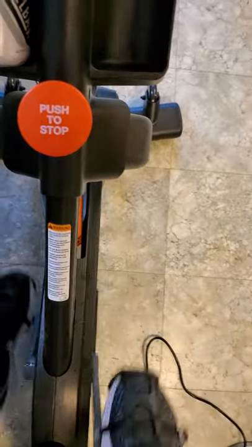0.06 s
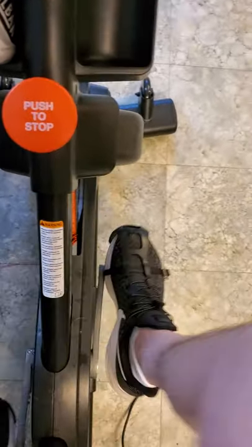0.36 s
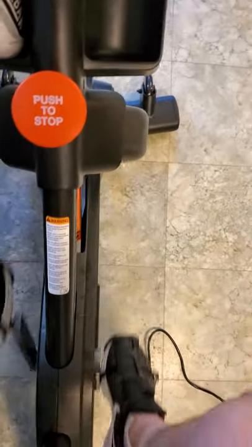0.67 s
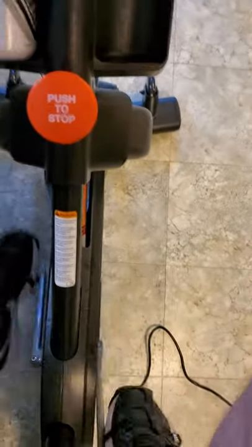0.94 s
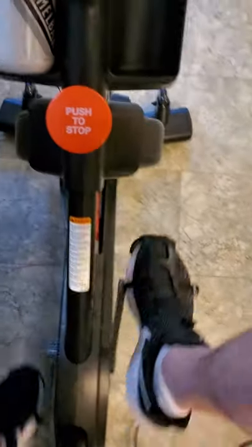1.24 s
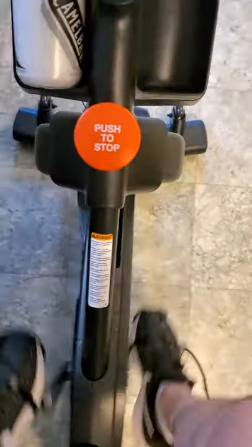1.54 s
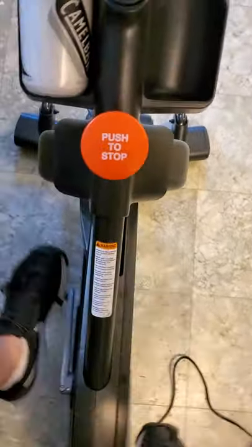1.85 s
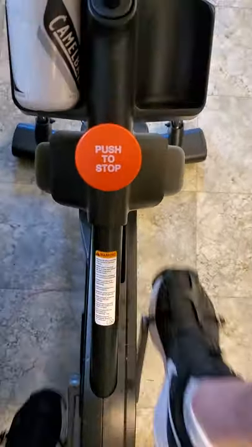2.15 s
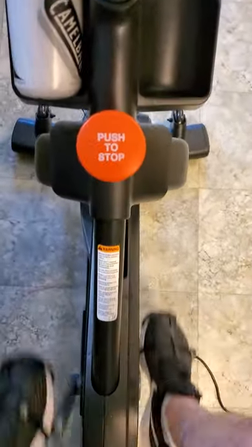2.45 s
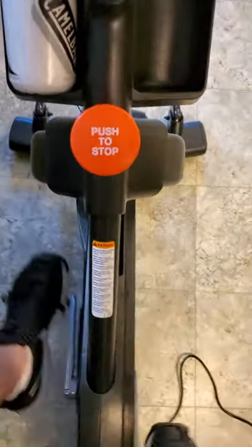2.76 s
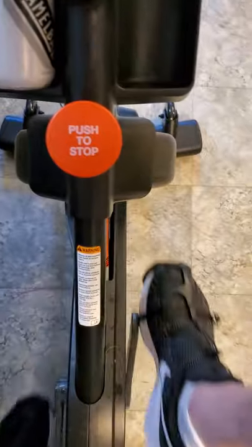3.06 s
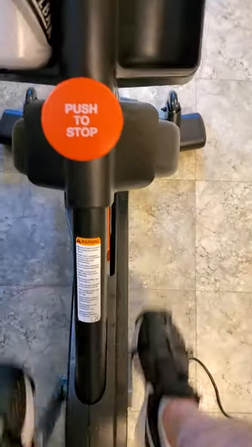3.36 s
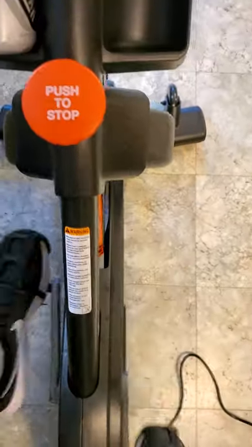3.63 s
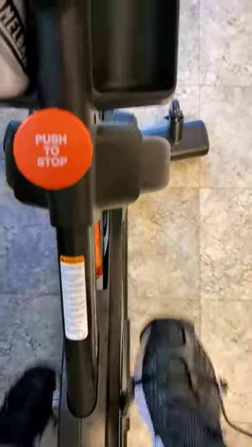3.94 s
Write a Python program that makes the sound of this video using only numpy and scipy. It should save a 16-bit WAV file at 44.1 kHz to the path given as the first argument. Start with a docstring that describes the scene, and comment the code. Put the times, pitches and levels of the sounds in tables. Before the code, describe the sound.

Loose parts knock in a pedaled exercise bike while its wheel whirrs and hisses.

```python
"""In a small tiled room, on the saddle of an exercise bike. The flywheel whirrs steadily, the drive
hums, and each pedal stroke swells a hiss of rubbing on the wheel. Loose parts in the drive knock
several times a turn: each knock is a short chatter of contacts that rings the frame and the room.
A few sharp ticks come from the bike, something brushes lightly on the right, and the hand that
holds the microphone makes soft bumps."""
import sys
import numpy as np
from scipy import signal
from scipy.fft import rfft, irfft
from scipy.io import wavfile
from scipy.ndimage import uniform_filter1d

SR = 44100
rng = np.random.default_rng(int(sys.argv[2]) if len(sys.argv) > 2 else 0)


def wrap_up_sound(samples):
    """Save the sound to the file named by the first command line argument, as 16-bit audio."""
    columns = np.atleast_2d(samples).T
    # keep every value between -1 and 1, then stretch to whole-number steps
    tamed = np.clip(columns, -1, 1)
    steps = np.round(tamed * 32767).astype(np.int16)
    wavfile.write(sys.argv[1], SR, steps)


N = 176400  # 4 seconds


def undb(db):
    """Turn decibels into a gain to multiply by."""
    return 10 ** (np.asarray(db) / 20)


def unit(x):
    """Scale a sound to an average power of 1."""
    return x / np.sqrt(np.mean(x ** 2))


def sized(x, seconds):
    """Give a hit the energy of a power-1 sound of this length."""
    return x * np.sqrt(seconds * SR / np.sum(x ** 2))


def add(out, start_s, x):
    """Mix x into out at the given time."""
    i = max(int(start_s * SR), 0)
    out[..., i:i + x.shape[-1]] += x[..., :max(N - i, 0)]


def lowpass(x, hz, order=2):
    """Dull a sound by turning down what lies above hz."""
    return signal.sosfilt(signal.butter(order, min(hz, .45 * SR), fs=SR, output="sos"), x)


def colour(x, points):
    """Shape bass and treble along a curve of (pitch_hz, gain_db) points."""
    hz, db = np.array(points).T
    bins_hz = np.maximum(np.fft.rfftfreq(N, 1 / SR), 1)
    gain = undb(np.interp(np.log(bins_hz), np.log(hz), db))
    return irfft(rfft(x) * gain, N)


def wander(per_s):
    """A smooth random drift, about 1 in size."""
    hold = int(SR / per_s)
    steps = np.repeat(rng.standard_normal(N // hold + 1), hold)
    return unit(uniform_filter1d(uniform_filter1d(steps, hold), hold)[:N])


def pan(db):
    """Left and right gains; positive db favours the left."""
    return undb(np.array([[db], [-db]]) / 2)


def ring(tones, t):
    """A struck part's tones, tuned a little differently at each blow; each drops 60 dB in fade_s."""
    detune = 1 + 0.0073 * rng.standard_normal(len(tones))
    return sum((-1) ** k * undb(db - 60 * t / fade_s) * np.sin(2 * np.pi * hz * detune[k] * t)
               for k, (hz, fade_s, db) in enumerate(tones))


def room(x):
    """Tiled walls return a wash of echoes on each side, the treble dying first."""
    bass_fade_s, treble_fade_s, delay_s = 0.52, 0.24, 0.0023
    t = np.arange(SR // 2) / SR
    noise = rng.standard_normal((2, len(t)))
    bass = lowpass(noise, 1000)
    tails = bass * undb(-60 * t / bass_fade_s) + (noise - bass) * undb(-60 * t / treble_fade_s)
    tails *= np.clip(t / delay_s - .5, 0, 1)
    return np.array([signal.fftconvolve(x, tail / np.sqrt(np.sum(tail ** 2)))[:N] for tail in tails])


def flywheel_whirr():
    """The spinning wheel keeps the frame's low resonances sounding."""
    # tone of the wheel and room: pitch_hz, gain_db
    whirr_curve = [(20, -6), (35, 4), (65, 1), (100, -9), (170, -5), (225, -1), (270, -5), (310, -3.5),
                   (370, -5), (440, 3), (520, -8.5), (650, -11), (800, -17.5), (1400, -23.5), (2100, -22),
                   (3200, -33.5), (8000, -36.5), (16000, -37)]
    # stereo width, as side compared with middle: pitch_hz, gain_db
    width_curve = [(30, -13.5), (250, -13), (500, -9.5), (1000, 4), (4000, -2.5)]
    middle, side = (unit(colour(rng.standard_normal(N), whirr_curve)) for _ in range(2))
    level_db = -50.5 + 1.25 * wander(per_s=12)
    return undb(level_db) * (middle + colour(side, width_curve) * np.array([[1], [-1]]))


def drive_hum():
    """The running drive gives one faint, wavering tone."""
    level_db = -60.5 + 2 * wander(per_s=7.9)
    pitch_hz = 264.6 * (1 + 0.0124 * wander(per_s=15))
    return undb(level_db) * unit(np.sin(2 * np.pi * np.cumsum(pitch_hz) / SR))


def light_brushes():
    """Something slides lightly, close on the right, in short hisses."""
    # slides: start_s, length_s, level_db
    slides = [(0.645, 0.19, -56.5), (0.866, 0.11, -53), (1.026, 0.12, -50), (1.807, 0.11, -48.5)]
    # tone of the sliding: pitch_hz, gain_db
    slide_curve = [(500, -16), (7000, -11.5), (9500, -16.5), (12500, -3.5), (14500, -0.5), (16000, -15)]
    left_db = -14
    swell = np.zeros(N)
    for start_s, length_s, level_db in slides:
        add(swell, start_s, undb(level_db) * signal.windows.tukey(int(length_s * SR), .6))
    hiss = unit(colour(rng.standard_normal((2, N)), slide_curve))
    flicker = undb(2 * wander(per_s=90))
    return swell * flicker * hiss * undb([[left_db], [0]])


def hand_bumps():
    """The hand shifts on the microphone's case, making short dull rumbles."""
    # hand movements: start_s, length_s, level_db, cutoff_hz
    bumps = [(1.467, .075, -41, 256), (1.536, 0.058, -44, 122), (1.789, 0.12, -50, 107),
             (1.886, .012, -39, 520), (2.763, 0.067, -48.5, 118), (2.82, 0.092, -43, 64)]
    out = np.zeros(N)
    for start_s, length_s, level_db, cutoff_hz in bumps:
        count = int(length_s * SR)
        rumble = lowpass(rng.standard_normal(SR // 2), cutoff_hz, order=3)[-count:]
        add(out, start_s, undb(level_db) * unit(rumble * signal.windows.tukey(count, .5)))
    return out


def sharp_ticks():
    """A small hard part snaps: a brief ring and a bright splash of noise."""
    # snaps: start_s, level_db, left_over_right_db, splash_over_ring_db
    ticks = [(0.0788, -19.5, -10, 4), (.935, -45, -8, 6), (1.086, -43, -1, 6), (1.478, -51.5, 18.5, 6),
             (1.891, -34, -13, 15.5), (1.935, -40.5, -9.5, -4), (3.418, -51, -20, 3)]
    # ringing tones of the part: pitch_hz, fade_s, level_db
    part_tones = [(2120, 0.0028, 1.5), (3870, .004, 6), (5820, 0.0025, 7), (7000, 0.0019, 8)]
    splash_hz, splash_s, room_db = 13780, 0.00061, -11.5
    out, t = np.zeros((2, N)), np.arange(SR // 40) / SR
    for start_s, level_db, pan_db, splash_db in ticks:
        # multiplying by a tone moves the dull noise up around splash_hz
        noise = lowpass(rng.standard_normal((2, len(t))), 1920) * np.cos(2 * np.pi * splash_hz * t)
        splash = noise * t * np.exp(-t / splash_s)
        snap = unit(ring(part_tones, t)) + undb(splash_db) * unit(splash)
        add(out, start_s, undb(level_db) * pan(pan_db) * sized(snap, seconds=0.0024))
    return out + undb(room_db) * room(out.mean(axis=0))


def flywheel_rubbing():
    """Friction on the flywheel makes a hiss that rises and falls with each pedal stroke."""
    # pedal strokes, each lasting until the next: start_s, push_db
    strokes = [(-.2, 5.5), (.21, 4.5), (0.732, 5), (1.171, 4.5), (1.65, 3.5), (2.1, 3), (2.55, 3.5),
               (3.04, 3), (3.52, 2.5), (4.02, 2)]
    # tone of the rubbing on the left: pitch_hz, gain_db
    left_curve = [(1000, -38), (2100, 0.5), (2900, -4.5), (5000, -10.5), (7200, -3.5), (8500, -9),
                  (10500, -13), (13000, -1.5), (15500, -19)]
    # and on the right: pitch_hz, gain_db
    right_curve = [(1000, 0), (2100, 4.5), (2800, -4.5), (3900, 0.5), (5000, -2.5), (7000, 1.5), (8800, -9),
                   (10800, -2), (12500, 5), (14000, 5), (16000, -1)]
    left_db, right_db, resting_gain = -64, -52.5, 0.43
    start_s, push_db = np.array(strokes).T
    strokes_done = np.interp(np.arange(N) / SR, start_s, np.arange(len(start_s)))
    push = np.abs(np.sin(np.pi * strokes_done)) * undb(push_db)[strokes_done.astype(int)]
    effort = (resting_gain + (1 - resting_gain) * push) * undb(wander(per_s=30.01))
    left = undb(left_db) * unit(colour(rng.standard_normal(N), left_curve))
    right = undb(right_db) * unit(colour(rng.standard_normal(N), right_curve))
    return effort * np.array([left, right])


def chatter_force(t, rise_s):
    """The force of a run of contacts builds to a peak and dies away."""
    first_touch, decay_s = 0.55, 0.0059
    rising = first_touch + (1 - first_touch) * t / rise_s
    falling = np.exp(-np.maximum(t - rise_s, 0) / decay_s)
    return np.where(t < rise_s, rising, falling)


def drive_knocks():
    """Loose parts chatter, ring the frame and thud in the housing; a softer echo follows each knock."""
    # knocks (a harder contact has a higher cutoff): start_s, level_db, cutoff_hz, rise_s
    knocks = [(.146, -44, 1157, .014), (.333, -41.5, 1300, .011), (0.611, -44, 850, 0.0097),
              (.705, -30, 2220, 0.019), (0.762, -51, 730, 0.0056), (.798, -43.5, 566, 0.0078),
              (0.906, -47.5, 870, 0.0037), (1.084, -44.5, 1200, 0.017), (1.263, -37.5, 1300, 0.02),
              (1.519, -47, 990, 0.0053), (1.617, -36, 2200, 0.016), (1.791, -41, 970, 0.0053),
              (1.965, -46, 975, 0.0043), (2.038, -43.5, 880, 0.014), (2.125, -29.5, 2200, 0.016),
              (2.48, -42.5, 1160, 0.0124), (2.657, -38, 970, 0.0071), (2.844, -50.5, 780, 0.019),
              (2.912, -43, 1020, 0.015), (3.007, -30, 2380, .016), (3.374, -48, 1090, 0.0067),
              (3.545, -37, 1230, 0.02), (3.805, -39.5, 880, 0.017), (3.905, -36, 2080, 0.02),
              (3.987, -36.5, 880, 0.029)]
    # ringing tones of the frame: pitch_hz, fade_s, level_db
    frame_tones = [(238.7, 0.13, -7.5), (445.5, 0.14, 1), (560.6, 0.078, -4.5), (606, 0.11, -1.5),
                   (700.4, 0.053, 0), (871.4, 0.11, -7), (952, 0.06, 1.5), (1096, 0.073, -4.5),
                   (1255, 0.046, -5.5), (1674, 0.076, -2.5), (1775, 0.041, -3), (2030, 0.082, -7),
                   (2310, 0.055, -9.5), (2606, 0.026, -3.5), (2920, 0.056, 5.5), (3430, 0.026, 4)]
    # tone of the housing's dull thud: pitch_hz, gain_db
    thud_curve = [(60, -26), (200, -11.5), (400, -0.5), (650, -2), (790, -9.5), (950, -15.5), (1250, -6),
                  (1480, -14.5), (1750, -5.5), (2200, -6), (2900, 2), (3500, -11), (5000, -23)]
    # what the room returns of a knock: pitch_hz, gain_db
    echo_curve = [(150, -19), (300, -7), (480, -2), (1000, -1.5), (1800, 4.5), (3200, -11)]
    contacts_per_s, scatter_db, thud_db = 2500, 0.5, -3
    left_lag_s, pan_db, room_db = 0.00017, -2.5, -5.5
    after_knock = (.045, -12.5, 990)  # delay_s, drop_db, cutoff_hz
    out, t = np.zeros(N), np.arange(SR // 7) / SR
    housing = colour(rng.standard_normal(N), thud_curve)
    for start_s, level_db, first_cutoff_hz, rise_s in knocks:
        force = chatter_force(t, rise_s)
        for delay_s, drop_db, cutoff_hz in ((0, 0, first_cutoff_hz), after_knock):
            sizes = rng.choice([-1, 1], len(t)) * undb(scatter_db * rng.standard_normal(len(t)))
            touching = rng.random(len(t)) < contacts_per_s / SR
            frame = signal.fftconvolve(force * touching * sizes, ring(frame_tones, t))[:len(t)]
            thud = force * np.roll(housing, rng.integers(N))[:len(t)]
            blow = lowpass(unit(frame) + undb(thud_db) * unit(thud), cutoff_hz, order=3)
            add(out, start_s + delay_s, undb(level_db + drop_db) * sized(blow, seconds=.018))
    left = np.interp(np.arange(N) - left_lag_s * SR, np.arange(N), out)
    echoes = undb(room_db) * room(colour(out, echo_curve))
    return (np.array([left, out]) + echoes) * pan(pan_db)


def scene():
    """Add all the sounds together in stereo."""
    return (drive_knocks() + flywheel_rubbing() + flywheel_whirr() + drive_hum()
            + sharp_ticks() + light_brushes() + hand_bumps())


def record(dry):
    """Cut off the very highest treble."""
    top_hz = 15900
    return signal.sosfilt(signal.ellip(10, .2, 80, top_hz, fs=SR, output="sos"), dry)


dry = scene()
out = record(dry)
wrap_up_sound(out)
```